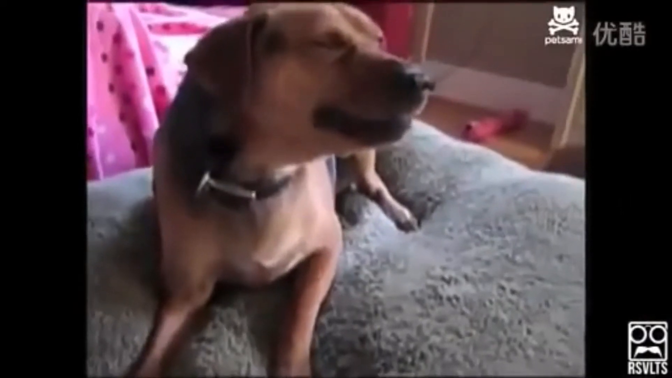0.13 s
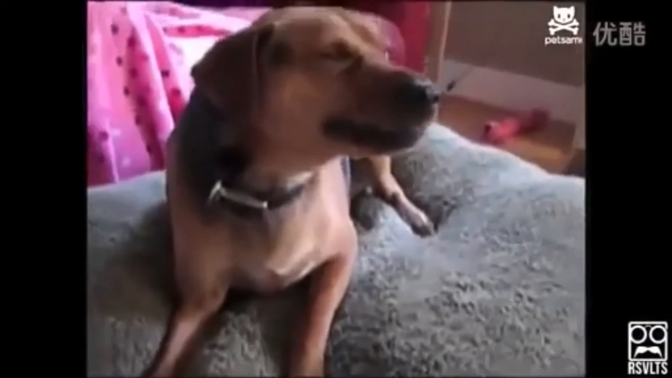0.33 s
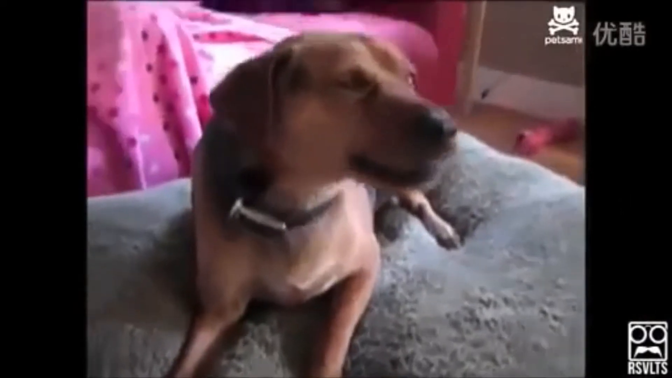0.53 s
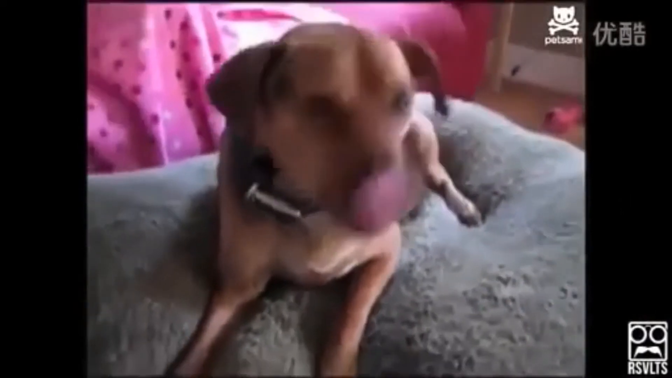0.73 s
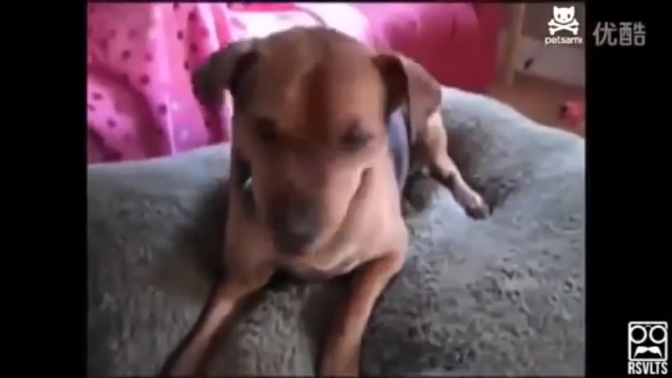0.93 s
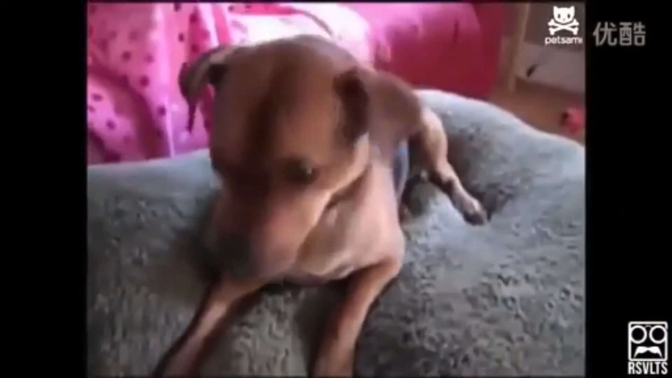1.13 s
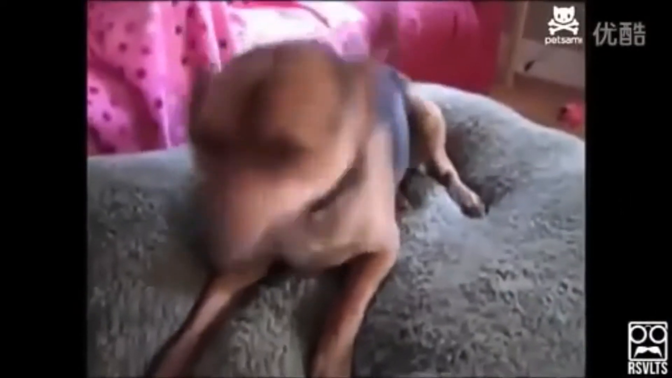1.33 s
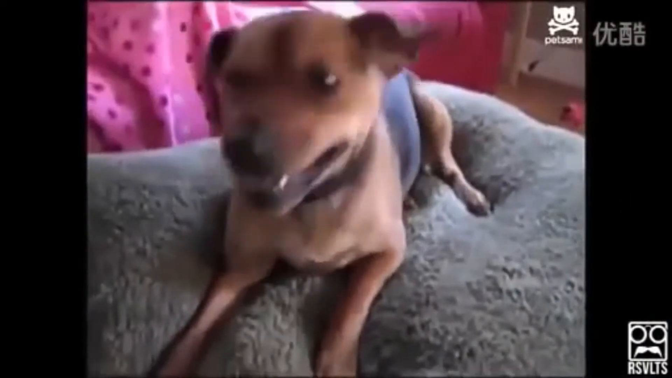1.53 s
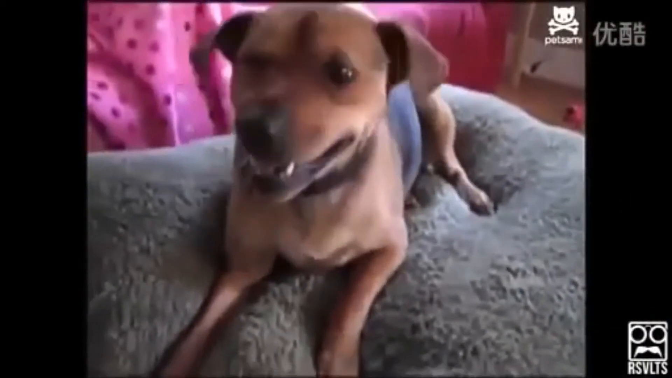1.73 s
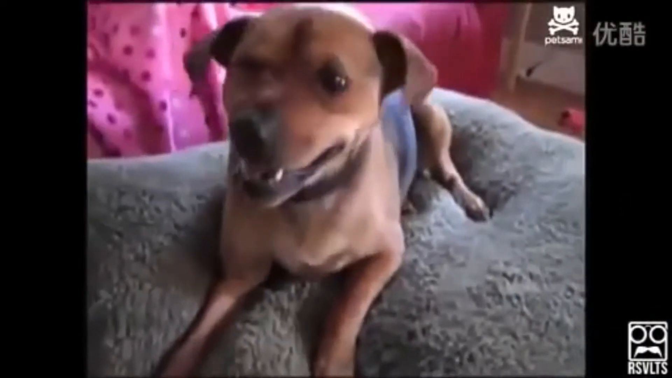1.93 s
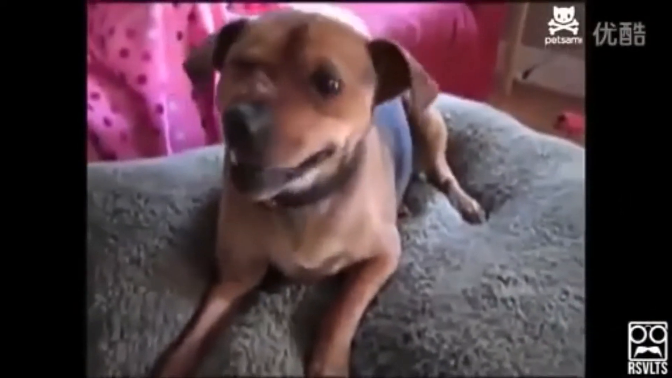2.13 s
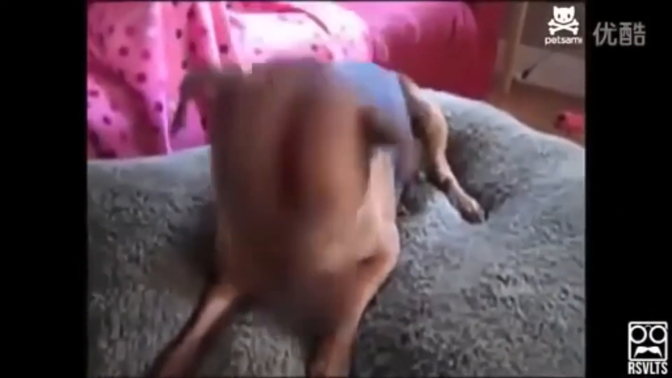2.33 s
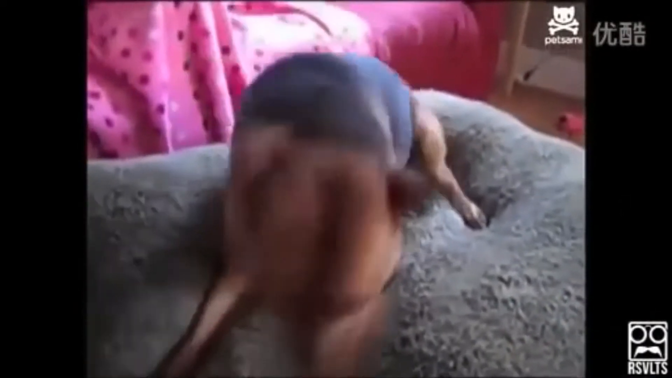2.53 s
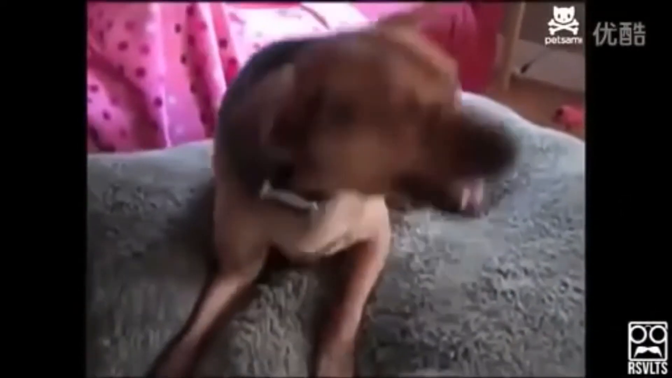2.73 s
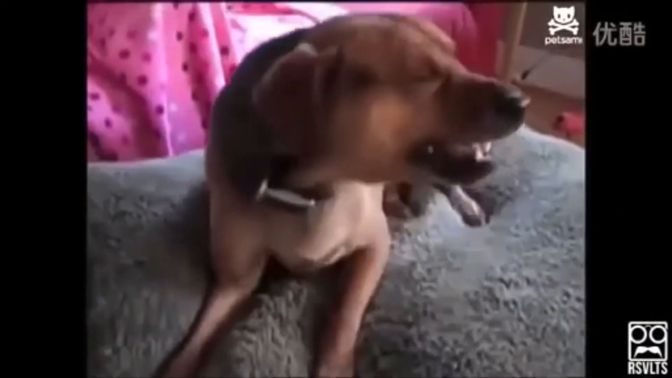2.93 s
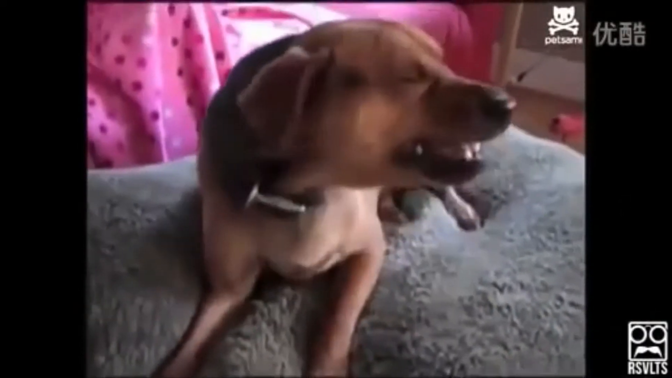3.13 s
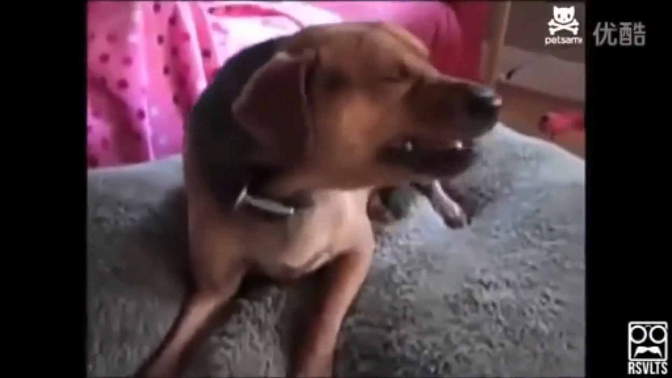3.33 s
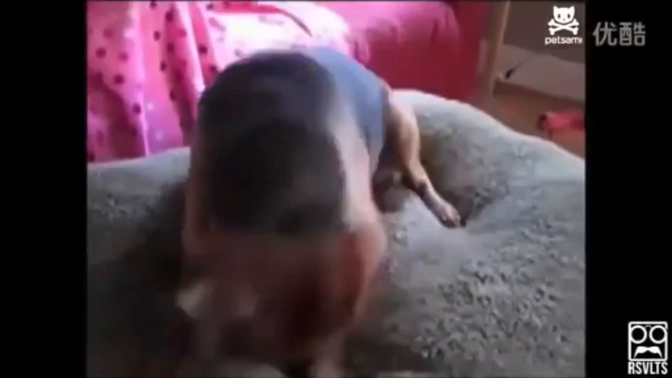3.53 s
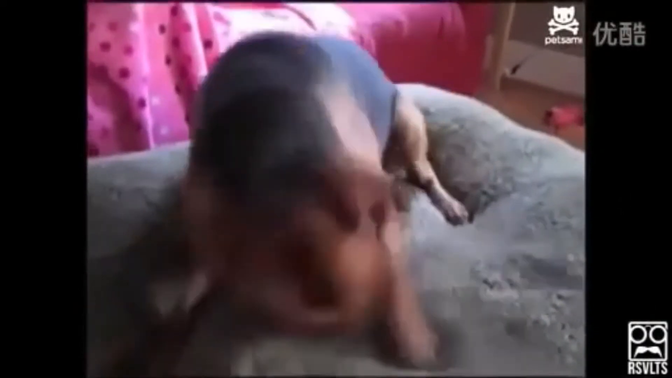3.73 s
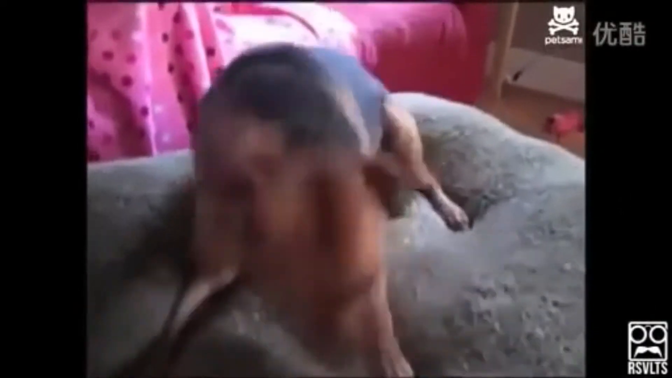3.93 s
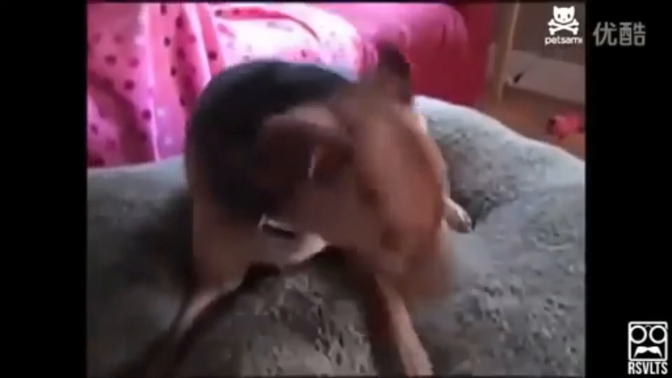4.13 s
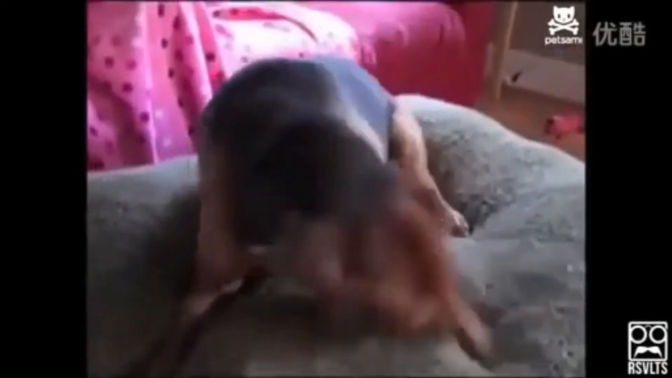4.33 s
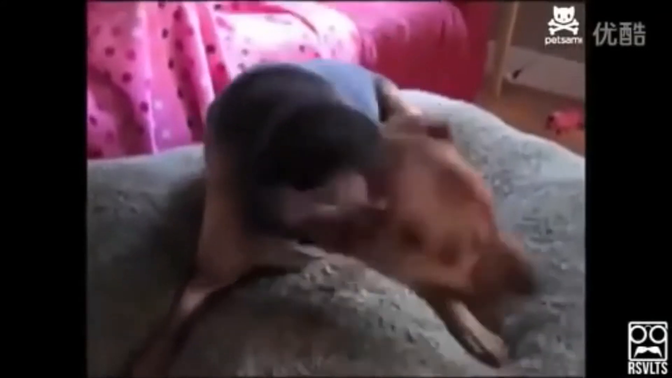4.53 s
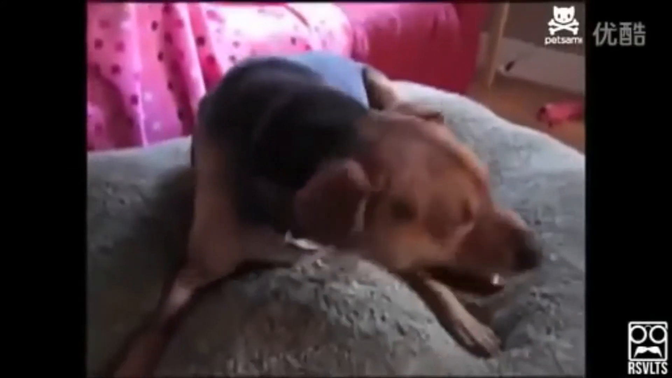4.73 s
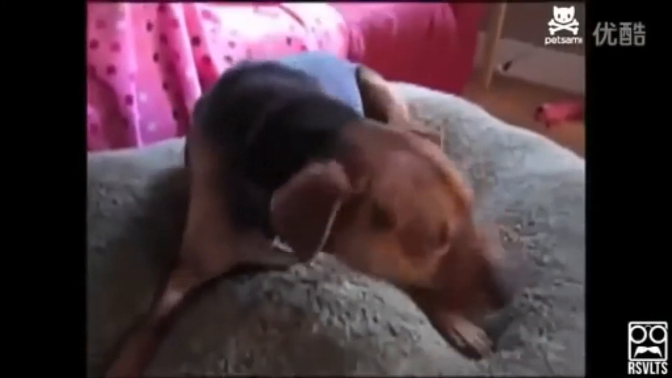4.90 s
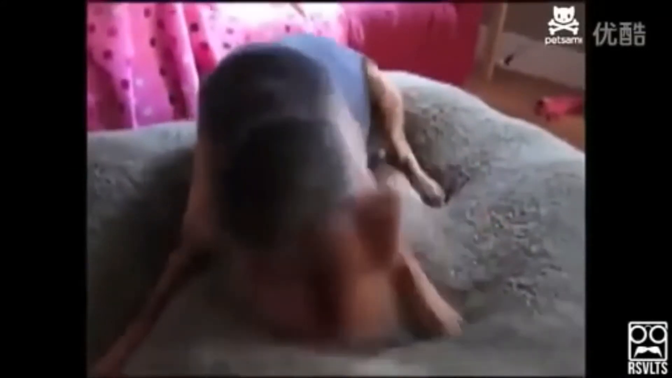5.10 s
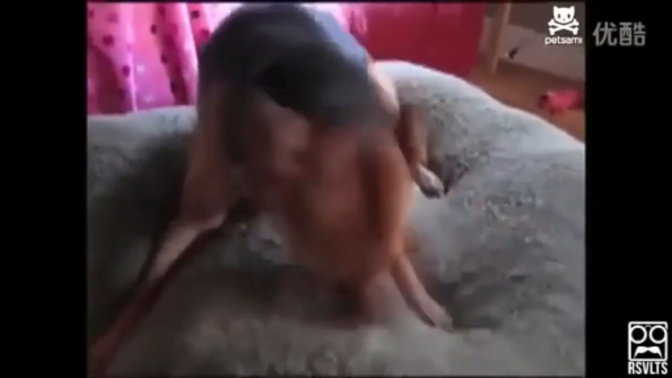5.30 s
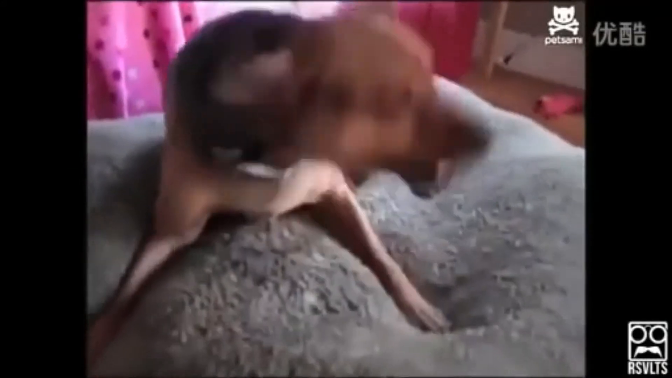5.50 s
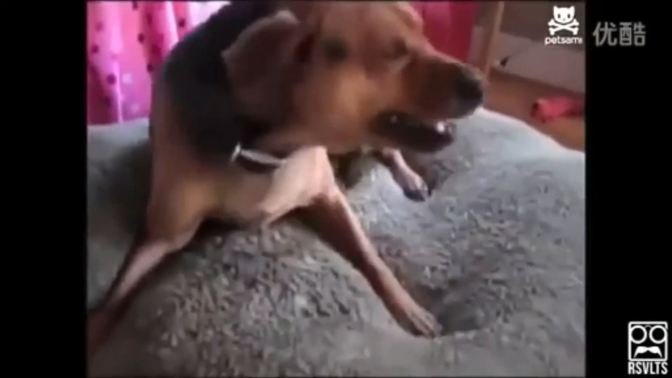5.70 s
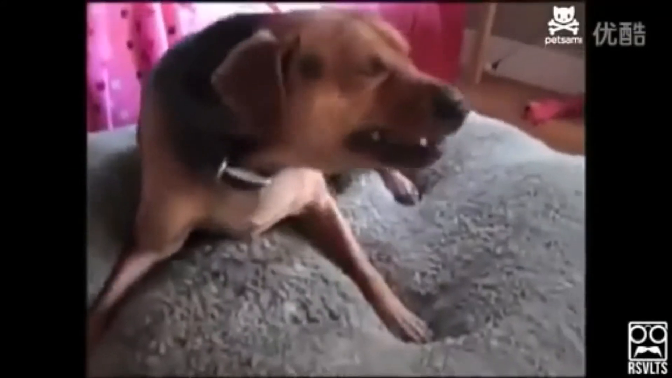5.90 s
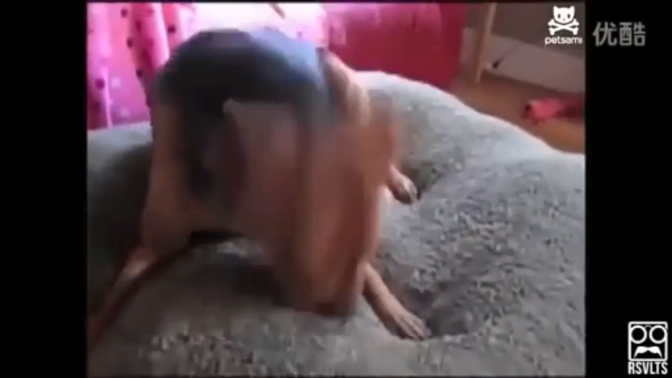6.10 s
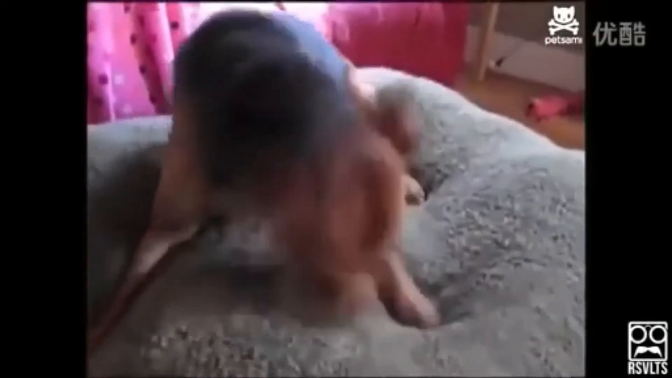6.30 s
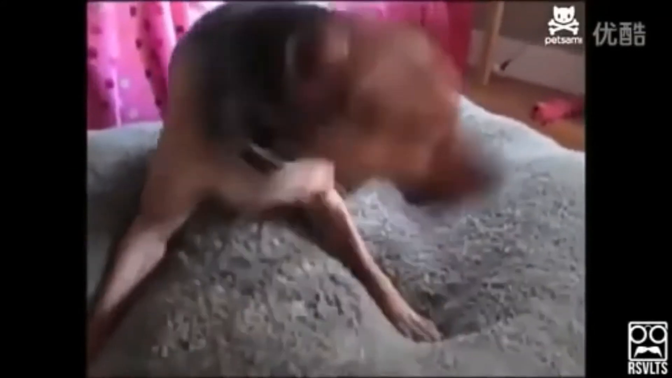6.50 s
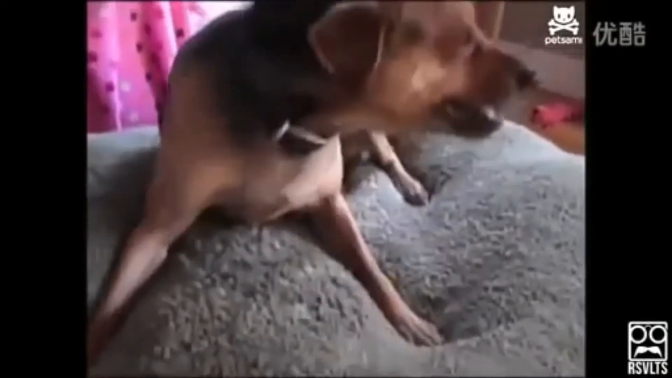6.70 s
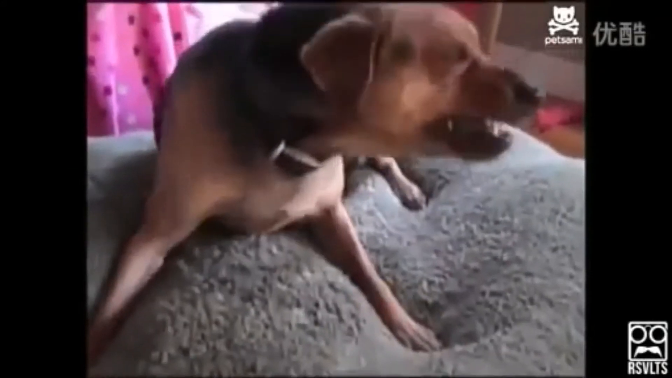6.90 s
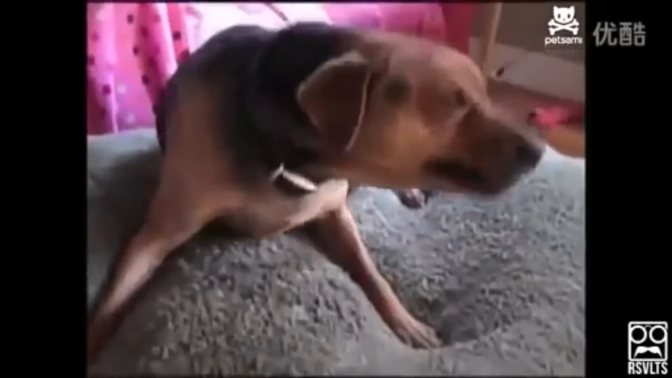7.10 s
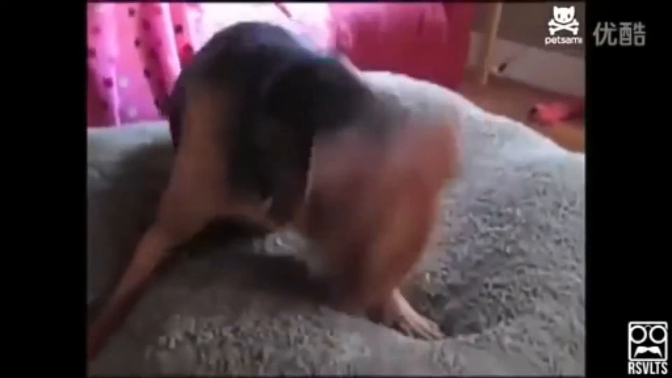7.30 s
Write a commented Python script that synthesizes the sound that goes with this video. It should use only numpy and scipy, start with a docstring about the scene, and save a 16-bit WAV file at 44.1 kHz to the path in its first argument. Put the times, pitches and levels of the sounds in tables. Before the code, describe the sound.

A dog snorts twice, then sneezes six times in sharp, wet, hissing bursts, with collar clicks and soft bed rustles in a quiet room.

```python
'''A dog snorts and sneezes on its bed in a softly murmuring room: noise shaped by nose, mouth and throat.
First come small sniffles, a lip pop, a bed rustle and a collar click, then two snorts, the first in
two pushes, and collar clicks. From 2.3 s on it sneezes six times: a grunt and a spurt open each sneeze,
the palate flutters and slaps the throat, and air rasps. Gasps, wet pops, collar chatter and rustles
fall in between. Reflections follow every sound.'''
import sys
import numpy as np
from scipy import signal
from scipy.fft import rfft, irfft
from scipy.io import wavfile
from scipy.ndimage import uniform_filter1d, map_coordinates

SR = 44100
rng = np.random.default_rng(int(sys.argv[2]) if len(sys.argv) > 2 else 0)


def dump_mix(stems):
    """Bounce the given channels to the path in sys.argv[1] as a 16-bit WAV at rate SR."""
    frames = np.atleast_2d(stems).T  # one column per channel
    limited = np.clip(frames, -1, 1)  # hard clip at full scale
    pcm = np.round(limited * 32767).astype(np.int16)
    wavfile.write(sys.argv[1], SR, pcm)


N = 324135
TIME = np.arange(N) / SR

# All levels are relative: the functions below trim them further.
# Murmur of the room with microphone hiss. Each row: frequency in Hz, level in dB per Hz.
HUSH_SPECTRUM = [(15, -55), (25, -31), (37, -9.5), (88, -0.5), (167, -13), (293, -12.5), (383, -14.5),
                 (475, -18), (769, -18.5), (1060, -21.5), (3730, -39.5), (4750, -37), (6900, -39),
                 (10900, -41.5), (15000, -55.5)]
HUSH_DB = -44
# How long the reflections last. Each row: frequency in Hz, time to fall 60 dB in seconds.
ROOM_DECAY = [(100, 0.44), (500, 0.54), (2000, 0.42), (5000, 0.53), (8000, 0.16), (14000, 0.47)]

# Body and paws press into the bed. Each row: start in seconds, length in seconds, level in dB.
BED_PRESSES = [(0.445, 0.026, -37.5), (0.684, 0.043, -32.5), (1.175, 0.166, -34.5), (2.589, 0.071, -33),
               (2.691, 0.38, -45), (3.99, 0.28, -39.5), (4.546, 0.075, -34), (5.452, 0.32, -40),
               (5.704, 0.022, -38.5)]
# Tone of the rustling bed. Each row: frequency in Hz, level in dB per Hz.
BED_SPECTRUM = [(40, -6.5), (110, -0.5), (350, -1.5), (600, -6.5), (1000, -2.5), (1600, -19), (3000, -13),
                (9000, -38.5)]

# Clicks of the collar metal. Each row: start in seconds, level in dB,
# tilt towards the high resonances in dB per octave.
COLLAR_CLICKS = [(0.55, -39, 2), (1.3583, -20.5, -15.5), (1.5211, -21, -4.5), (2.537, -21.5, 7),
                 (2.6707, -17.5, 0), (4.074, -23.5, -1), (4.447, -19, 5), (4.5895, -22.5, -7.5),
                 (5.3982, -21.5, 15), (5.5899, -19.5, 10.5), (6.16, -22, -3.5), (6.436, -25, -3),
                 (6.598, -16, 15), (7.302, -26, 1.5)]
# Collar resonances, damped by fur. Each row: frequency in Hz, width in Hz, level in dB.
COLLAR_MODES = [(5360, 220, -5.5), (7360, 1100, 0.5), (9580, 300, -8.5)]
# Faint after-ring of the collar. Each row: frequency in Hz, level in dB, time to fall 60 dB in seconds.
COLLAR_JINGLE = [(5400, -46, .32), (7300, -48, .3), (8060, -34, 0.42), (10000, -41.5, 0.25)]

# Lips and tongue part wetly. Each row: start in seconds, level in dB, mouth resonance in Hz,
# decay time constant in seconds.
WET_POPS = [(0.436, -31, 3650, 0.0017), (0.594, -35, 3200, 0.0023), (1.443, -20.5, 3970, 0.0016),
            (2.266, -24, 780, 0.0056), (2.281, -23.5, 1852, 0.0072), (3.561, -13, 3100, 0.0049),
            (4.168, -17.5, 3103, 0.006), (5.045, -28, 2550, 0.007), (5.704, -31, 900, 0.0046),
            (6.158, -4.5, 2300, 0.0031), (6.468, -24, 2401, 0.018), (7.326, -8, 3280, 0.0081)]
# Sniffles of the tickled nose. Each row: start in seconds, length in seconds, level in dB,
# share of mouth noise in dB.
SNIFFLE_PUFFS = [(0.35, 0.093, -59.5, -2), (0.417, 0.06, -50, -10), (0.478, 0.2, -54, -5),
                 (2.159, 0.56, -45, -2.5), (3.42, 0.12, -56.5, -1), (4.962, 0.097, -47, -1.5),
                 (5.694, 0.058, -36.5, -11.5), (5.971, 0.063, -55, -7), (6.037, 0.05, -48.5, -4),
                 (6.084, 0.12, -40.5, -17), (7.198, 0.06, -55.5, -1), (7.246, 0.11, -44, -16)]
# Gasps through the open mouth. Each row: start in seconds, length in seconds, level in dB.
GASP_BREATHS = [(2.556, 0.22, -33), (3.953, 0.31, -31.5), (4.472, 0.22, -34), (5.369, 0.28, -32),
                (6.44, 0.26, -35.5)]
# Tone of the gasps. Each row: frequency in Hz, level in dB per Hz.
GASP_SPECTRUM = [(150, -22), (300, -6), (1000, -3), (1700, -2.5), (2500, 1.5), (3400, 0), (5000, -11.5),
                 (9000, -34)]
# Rasps in the throat. Each row: start in seconds, length in seconds, level in dB,
# first resonance in Hz, second resonance in Hz, slide of both in octaves.
THROAT_RASPS = [(2.287, .15, -24.5, 400.5, 1877, -0.47), (3.574, 0.038, -12, 900, 1450, 0.1),
                (3.601, 0.058, -13, 856.4, 1186, 0.32), (3.691, 0.047, -18.5, 1170, 1732, .05),
                (4.329, 0.055, -23, 760, 990, .15)]
# Opening grunts. Each row: start in seconds, length in seconds, level in dB, first pitch in Hz,
# last pitch in Hz.
GRUNT_BURSTS = [(2.285, .06, -24.5, 151.2, 107.3), (3.513, 0.013, -8.5, 413, 274),
                (3.526, 0.032, -21.5, 314, 264), (4.191, 0.02, -17.5, 413, 307),
                (5.069, 0.025, -12.5, 350, 263), (6.12, 0.0243, -13, 407, 236.6),
                (7.282, 0.022, -17, 318, 223)]
# The hardest slaps of the soft palate. Each row: start in seconds, level in dB.
PALATE_SLAPS = [(2.377, -17.5), (2.406, -7.5), (3.593, -6), (3.616, -11), (3.662, -7), (3.705, -4),
                (5.203, -5.5), (5.241, -12.5), (6.17, -6), (6.198, -2), (6.244, -4.5), (6.298, -5.5)]
# The throat struck by the palate, low and high. Each row: frequency in Hz, width in Hz, level in dB.
THROAT_LOW_MODES = [(130, 230, -18.5), (435, 150, 6.5), (580, 360, -5)]
THROAT_HIGH_MODES = [(974, 120, 4), (1530, 280, 9), (3200, 1200, -4.5)]

# Blasts of air, two snorts and then six sneezes, some in two or three pushes. Each row: start in seconds,
# rise in seconds, length in seconds, opening spurt in dB, then peaks in dB of nose hiss, nostril ring,
# mouth rush and throat rumble, fade of the nose in dB, fade of mouth and throat in dB.
AIR_BLASTS = [(0.682, 0.016, 0.054, -30, -23, -22, -41.5, -49, 3.5, -1.5),
              (0.711, 0.076, 0.26, -43, -14, -15, -33.5, -48.5, 18, 14.5),
              (0.954, 0.24, 0.3912, -49.5, -16.5, -17, -27, -34, 21, 15),
              (2.278, 0.05, 0.26, -42, -11.5, -7.5, -21, -25, 28.5, 20),
              (3.505, .014, .038, -16, -20, -33, -30, -26, 3, 0),
              (3.553, 0.017, .195, -25, -13, -21, -25, -19.5, 10.5, 4),
              (3.745, 0.024, 0.19, -56, -21.5, -28, -26.5, -21, -1, 9),
              (4.181, 0.055, 0.22, -25, -14, -22, -22.5, -21, 17.5, 12.5),
              (4.34, .035, 0.087, -49, -21.5, -38, -35.5, -30.5, 8.5, 5.5),
              (5.064, 0.054, 0.3, -33, -14.5, -24, -19.5, -19, 8, 14),
              (6.116, 0.052, .32, -20, -16, -22, -23, -21, 7, 10.5),
              (7.28, 0.052, 0.264, -28, -19, -22.5, -21, -20.5, 9.5, 15)]
# Tone of each passage. Each row: frequency in Hz, level in dB per Hz.
NOSE_SPECTRUM = [(500, -28), (3000, -23.5), (4200, -11), (5200, -6), (6300, 2.5), (8100, 0.5), (8800, -5.5),
                 (10000, -10.5), (10700, -17.5), (13000, -20), (15000, -37)]
NOSTRIL_SPECTRUM = [(2500, -32.5), (3700, -13), (4300, -3), (5000, -2.5), (5600, -18), (7000, -32)]
MOUTH_SPECTRUM = [(150, -21), (500, -7), (950, -4.5), (1300, -4), (1900, -0.5), (2400, 1), (2800, 0),
                  (3300, 0.5), (4000, -3), (5500, -15.5), (9000, -43)]
RUMBLE_SPECTRUM = [(25, -19), (55, -30), (78, -4), (108, 10), (165, -4), (225, 8), (280, -3), (390, 8),
                   (520, 0.5), (900, -6), (1600, -22), (4000, -38)]
# How each passage follows a blast. Each row: level at the opening in dB, share of the rise time,
# share of the fade, bend of the fade (over 1 holds on, then drops).
NOSE_FOLLOW = (-20.5, 1.04, 1.06, 1.33)
MOUTH_FOLLOW = (-23, 1, 0.94, 1.74)
THROAT_FOLLOW = (-9.5, 2.2, 2.23, 2.5)
# The nostrils pinch and ring around the hardest push. The row: moment as a share of the rise,
# width in seconds, more width as a share of the rise.
NOSTRIL_PINCH = (.85, .028, .42)
OPEN_S, CLOSE_S = .008, 0.035  # the airway opens and shuts
BUILD_BEND = 1.5  # pressure builds fast at first and then levels off
DRIFT_HZ = 14  # how fast the passages change shape
EDGE_HZ = 14950  # upper band limit


def amp(db):
    """Decibels to gain."""
    return 10 ** (np.asarray(db) / 20)


def unit(x):
    """Scales to rms 1."""
    return x / np.sqrt(np.mean(x ** 2) + 1e-20)


def read(points, hz):
    """Reads a table on a log-frequency axis."""
    f, value = np.transpose(points)
    return np.interp(np.log(hz + 1), np.log(f), value)


def add(mix, s, sound):
    """Mixes a sound in at time s."""
    part = mix[max(round(s * SR), 0):][:len(sound)]
    part += sound[:len(part)]


def colour(x, spectrum):
    """Gives x a spectrum, at rms 1."""
    gain = amp(read(spectrum, np.fft.rfftfreq(N, 1 / SR)))
    return unit(irfft(rfft(x) * gain, N))


def wander(rate_hz):
    """Slow chance, rms 1, up to the given rate."""
    kept = np.fft.rfftfreq(N, 1 / SR) < rate_hz
    return unit(irfft(rfft(rng.standard_normal(N)) * kept, N))


def swell(length, skew=0.31):
    """A push that grows and fades; the smaller the skew, the earlier its peak."""
    return np.sin(np.pi * np.linspace(0, 1, int(length * SR)) ** skew)


def resonate(x, hz, width):
    """A resonance of gain 1 that follows the curve hz."""
    turn = np.exp(2j * np.pi * np.cumsum(hz) / SR)
    r = np.exp(-np.pi * width / SR)
    # spin the resonance down to zero frequency, smooth, spin it back up
    return 2 * (turn * signal.lfilter([1 - r], [1, -r], x / turn)).real


def ring(modes):
    """The answer of damped resonances to one tap, peak 1."""
    t = np.arange(SR // 20) / SR
    sound = sum(amp(db) * np.exp(-np.pi * width * t) * np.sin(2 * np.pi * hz * t) for hz, width, db in modes)
    return sound / abs(sound).max()


def shifted(x, octaves):
    """Slides the resonances of a noise up and down along a curve."""
    return map_coordinates(x, [np.cumsum(2 ** octaves) % (N - 1)], order=3)


def turbulence(spectrum, patchy_db):
    """Noise whose small resonances come and go as the wet passages change shape."""
    z = signal.stft(rng.standard_normal(N), nperseg=512)[2]
    patches = uniform_filter1d(rng.standard_normal(z.shape), size=5, axis=0)  # across frequency
    patches = unit(uniform_filter1d(patches, size=7, axis=1))  # across time
    noise = signal.istft(z * amp(patchy_db * patches), nperseg=512)[1][:N]
    return colour(noise, spectrum)


def hush(side_db=-15):
    """The steady low murmur of the room and the faint hiss of the microphone."""
    mid, side = (colour(noise, HUSH_SPECTRUM) for noise in rng.standard_normal((2, N)))
    return amp(HUSH_DB) * (mid + amp(side_db) * np.array([side, -side]))


def room(x, apart=0.11):
    """Sparse reflections, each band dying at its own speed, slightly unlike in the two channels."""
    signs = rng.choice([-1., 1.], (2, SR))
    hits = rng.random((2, SR)) < 3000 / SR  # reflections per second
    taps = signs * hits * (np.arange(SR) > .004 * SR)
    hz, t, z = signal.stft(taps, SR, nperseg=256)
    decay = amp(-60 * t / read(ROOM_DECAY, hz)[:, None])
    mid, side = signal.istft(z * decay, SR, nperseg=256)[1]
    tails = np.array([mid + apart * side, mid - apart * side])
    return signal.fftconvolve(x[None], tails / np.linalg.norm(tails[0]), axes=1)[:, :N]


def ports(x, lag_s=.000004):
    """Two microphone ports side by side: the left hears the dog a little louder and a hair earlier."""
    late = irfft(rfft(x) * np.exp(-2j * np.pi * np.fft.rfftfreq(N, 1 / SR) * lag_s), N)
    return np.array([x, late]) * amp([[.1], [-.6]])


def thuds():
    """The plush bed gives way with a dull rustle: coloured noise under each push."""
    push = np.zeros(N)
    for s, length, db in BED_PRESSES:
        add(push, s, amp(db) * swell(length))
    return push * colour(rng.standard_normal(N), BED_SPECTRUM)


def collar(strike_s=0.0029, strike=2, tick_db=-2, body_db=-6, jingle_db=19, cluster_hz=350, rattle_s=0.02):
    """Metal chatters on metal around one hard strike, rattles to rest and rings on faintly."""
    out, t, after = np.zeros(N), TIME[:SR // 25], TIME[:SR // 3]
    edge = signal.butter(2, [2600, 14500], "bandpass", fs=SR)
    chatter_s, rattle = .0015, .13
    pressure = np.exp(-abs(t - strike_s) / chatter_s) + rattle * np.exp(-t / rattle_s) * (t > strike_s)
    for s, db, tilt_db in COLLAR_CLICKS:
        contacts = rng.standard_normal(len(t)) * pressure
        contacts[int(strike_s * SR)] += strike
        tick = signal.lfilter(*edge, contacts)
        add(out, s, amp(db + tick_db) * tick)
        for hz, width, level_db in COLLAR_MODES:
            level_db += tilt_db * np.log2(hz / COLLAR_MODES[1][0])
            hz *= 1 + 0.0067 * rng.standard_normal()  # each click lands on another spot
            body = signal.butter(1, [hz - width / 2, hz + width / 2], "bandpass", fs=SR)
            add(out, s, amp(db + level_db + body_db) * unit(signal.lfilter(*body, tick)))
        for hz, ring_db, t60 in COLLAR_JINGLE:
            # many close modes
            cluster = resonate(rng.standard_normal(len(after)), np.full(len(after), hz), cluster_hz)
            add(out, s + strike_s, amp(db + jingle_db + ring_db - 60 * after / t60) * unit(cluster))
    return out


def pops(sharpness=5.8):
    """A film of saliva bursts and briefly rings the mouth."""
    out, t = np.zeros(N), TIME[:SR // 12]
    for s, db, hz, decay in WET_POPS:
        burst = unit(resonate(rng.standard_normal(len(t)), np.full(len(t), hz), hz / sharpness))
        add(out, s, amp(db) * burst * np.exp(-t / decay))
    return out


def sniffles(crackle_db=2.5):
    """A little air crackles through the wet nose."""
    nose, mouth = np.zeros((2, N))
    for s, length, db, mouth_db in SNIFFLE_PUFFS:
        puff = amp(db) * swell(length, skew=0.35)
        add(nose, s, puff)
        add(mouth, s, amp(mouth_db) * puff)
    air = nose * turbulence(NOSE_SPECTRUM, patchy_db=2.0) + mouth * turbulence(MOUTH_SPECTRUM, patchy_db=2.5)
    return air * unit(amp(crackle_db * wander(300)))


def gasps(nose_db=-6, wet_db=1.84, drift=.09):
    """Quick draughts of air through the open mouth, whose resonances drift, made uneven by saliva."""
    draught = np.zeros(N)
    for s, length, db in GASP_BREATHS:
        add(draught, s, amp(db) * swell(length, skew=0.41))
    air = shifted(turbulence(GASP_SPECTRUM, patchy_db=3.5), drift * wander(DRIFT_HZ))
    air += amp(nose_db) * turbulence(NOSE_SPECTRUM, patchy_db=2.1)
    return draught * air * unit(amp(wet_db * wander(90)))


def rasps(width_hz=330):
    """Air tears through the narrowed throat, whose two resonances slide as the jaw moves."""
    out = np.zeros(N)
    for s, length, db, first_hz, second_hz, slide in THROAT_RASPS:
        push = swell(length)
        glide = 2 ** np.linspace(0, slide, len(push))
        air = rng.standard_normal(len(push))
        tearing = np.zeros(len(push))
        for hz in (first_hz, second_hz):
            once = resonate(air, hz * glide, width_hz)
            tearing += resonate(once, hz * glide, width_hz)  # twice, for steeper sides
        add(out, s, amp(db) * push * unit(tearing))
    return out


def grunts(overtone_db=-17):
    """The glottis bursts open and hums for a few cycles, falling in pitch."""
    out = np.zeros(N)
    for s, length, db, first_hz, last_hz in GRUNT_BURSTS:
        count = int(length * SR)
        phase = 2 * np.pi * np.cumsum(np.linspace(first_hz, last_hz, count)) / SR
        hum = np.sin(phase) + amp(overtone_db) * np.sin(2 * phase)
        add(out, s, amp(db) * signal.windows.tukey(count, .7) * hum)
    return out


def flaps(high_db=-3):
    """Hard slaps of the palate ring a throat that is never quite the same shape."""
    out = np.zeros(N)
    detunings = np.exp(0.11 * rng.standard_normal((len(PALATE_SLAPS), 2)))
    for (s, db), (low, high) in zip(PALATE_SLAPS, detunings):
        add(out, s, amp(db) * ring(np.array(THROAT_LOW_MODES) * [low, 1, 1]))
        add(out, s, amp(db + high_db) * ring(np.array(THROAT_HIGH_MODES) * [high, 1, 1]))
    return out


def surge(t, rise, length, fade_db, shape):
    """The gain of one passage during a blast: it opens, builds to a peak, fades as the lungs empty and shuts."""
    open_db, rise_share, fade_share, bend = shape
    peak = rise * rise_share
    building = np.clip(1 - t / peak, 0, 1) ** BUILD_BEND
    spent = np.maximum((t - peak) / (length - peak), 0) ** bend
    gate = np.clip(np.minimum(t / OPEN_S, 1 + (length - t) / CLOSE_S), 0, 1)
    return gate * amp(open_db * building - fade_db * fade_share * spent)


def airflow(lead_s=0.0044, spurt_s=.005, spurt_delay_s=0.007):
    """Strengths of nose, nostrils, mouth and throat; each blast opens with a spurt through the nose."""
    nose, nostrils, mouth, throat = np.zeros((4, N))
    pinch_at, pinch_s, pinch_share = NOSTRIL_PINCH
    for blast in AIR_BLASTS:
        s, rise, length, spurt_db, nose_db, nostril_db, mouth_db, throat_db, nose_fade_db, mouth_fade_db = blast
        t = np.arange(0, length + CLOSE_S, 1 / SR)
        add(nose, s, amp(nose_db) * surge(t, rise, length, nose_fade_db, NOSE_FOLLOW))
        add(mouth, s, amp(mouth_db) * surge(t, rise, length, mouth_fade_db, MOUTH_FOLLOW))
        add(throat, s, amp(throat_db) * surge(t, rise, length, mouth_fade_db, THROAT_FOLLOW))
        pinch = np.exp(-2 * ((t - pinch_at * rise) / (pinch_s + pinch_share * rise)) ** 2)
        add(nostrils, s, amp(nostril_db) * pinch * np.minimum(t / (pinch_at * rise), 1) ** .5)
        since = TIME - s - spurt_delay_s
        nose += amp(spurt_db) * np.exp(np.minimum(since / lead_s, -since / spurt_s))
    return nose, nostrils, mouth, throat


def sneezes(flaps_per_s=75, sputter_db=1.05, chop=0.25, lumpy_db=0.94, throat_drift=.05):
    """Snorts and sneezes: jets in nose and mouth; the fluttering palate chops the mouth's, knocks the throat."""
    nose, nostrils, mouth, throat = airflow()
    turns = np.cumsum(flaps_per_s * np.exp(.4 * wander(60))) / SR  # flutter speed wanders around its setting
    taps = np.diff(np.floor(turns), prepend=0) * amp(3.3 * wander(100))  # one tap a turn
    puffs = unit(1 + chop * np.cos(2 * np.pi * turns))
    sputter = unit(amp(sputter_db * wander(540)))  # mucus breaks up the jet
    hiss = amp(-.5) * nose * turbulence(NOSE_SPECTRUM, patchy_db=2.34)
    hiss += amp(-4.5) * nostrils * turbulence(NOSTRIL_SPECTRUM, patchy_db=3.5)
    rush = amp(2.5) * mouth * turbulence(MOUTH_SPECTRUM, patchy_db=3.5) * puffs
    struck_throat = ring(THROAT_LOW_MODES) + amp(-3) * ring(THROAT_HIGH_MODES)
    knocks = unit(signal.oaconvolve(taps, struck_throat)[:N])
    roar = shifted(turbulence(RUMBLE_SPECTRUM, patchy_db=3.5), throat_drift * wander(DRIFT_HZ))
    lumps = unit(amp(lumpy_db * wander(45)))
    rumble = throat * lumps * (amp(-3) * knocks + amp(-2.0) * roar)
    return (hiss + rush) * sputter + rumble


def scene():
    """The dog, a little left of centre, in its room."""
    air = sneezes() + grunts() + flaps() + rasps() + gasps() + sniffles() + pops() + thuds()
    metal = collar()
    reflections = room(amp(-10.0) * air + amp(-17.5) * metal)
    return ports(air + metal) + reflections + amp(-1.0) * hush()


def record(dry):
    """The deepest bass is dropped and the loudest peaks are rounded off; then the band limit."""
    dry = signal.lfilter(*signal.butter(1, 28, "highpass", fs=SR), dry)
    knee, headroom = .55, .35  # where rounding starts, and the most that can lie above it
    over = np.maximum(abs(dry) - knee, 0)
    rounded = np.sign(dry) * (abs(dry) - over + headroom * np.tanh(over / headroom))
    band_limit = signal.firwin(255, EDGE_HZ, window=("kaiser", 9), fs=SR)
    return signal.oaconvolve(rounded, band_limit[None], "same")


dry = scene()
out = record(dry)
dump_mix(out)
```